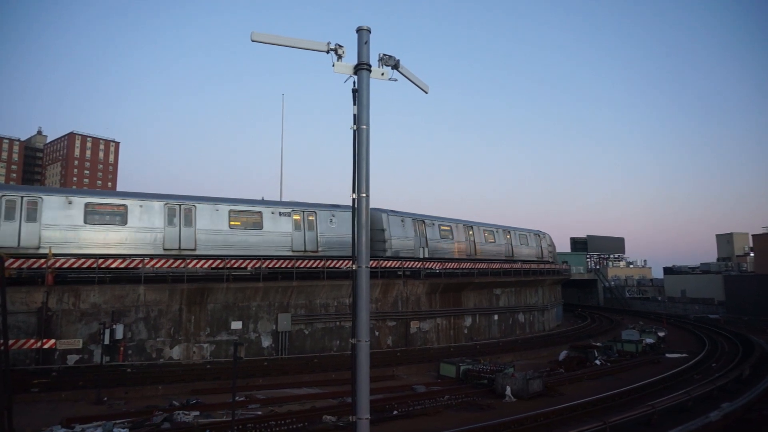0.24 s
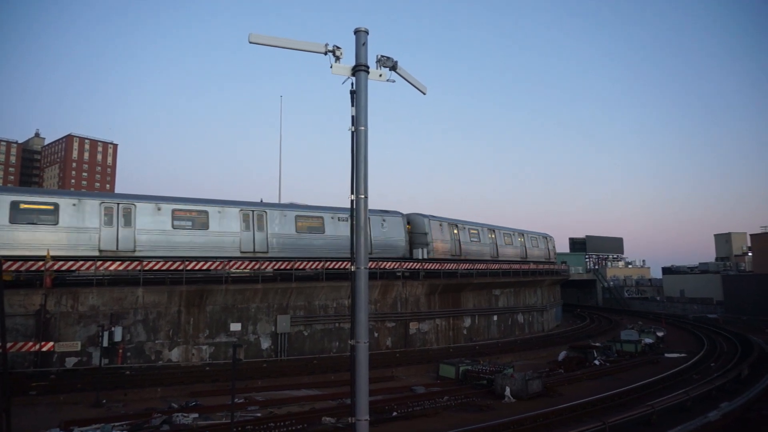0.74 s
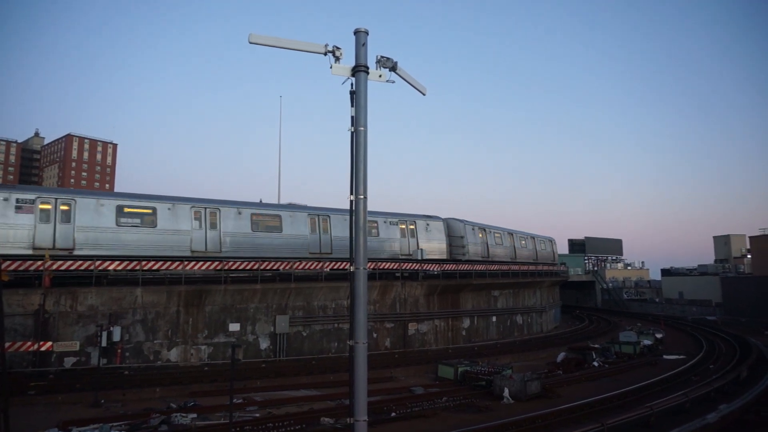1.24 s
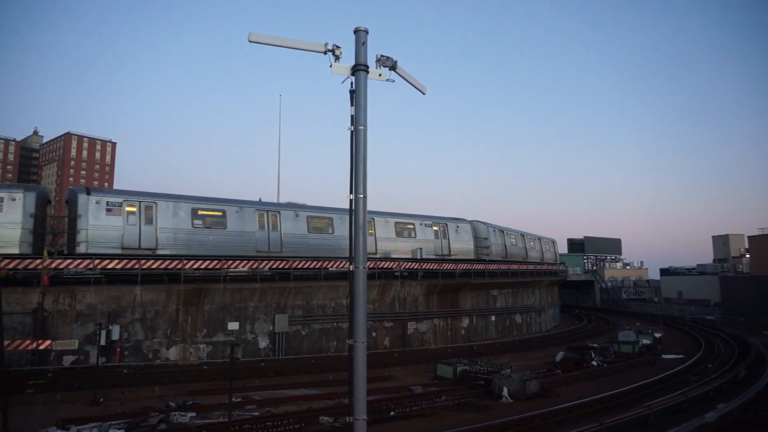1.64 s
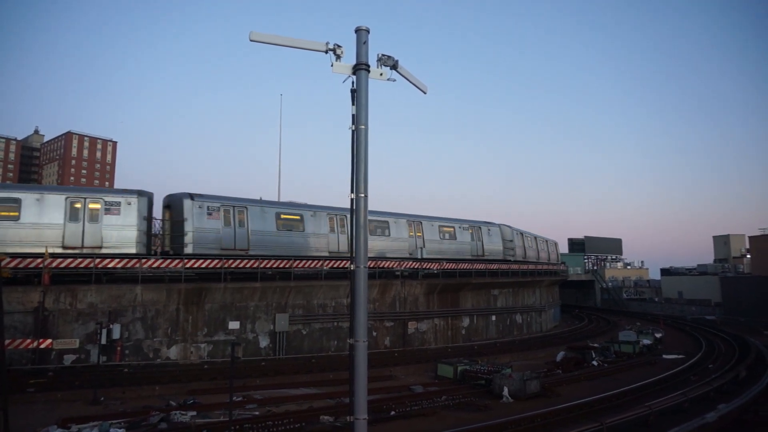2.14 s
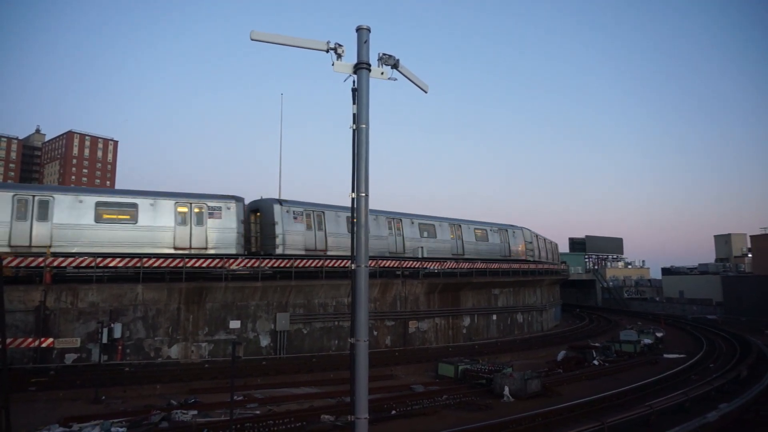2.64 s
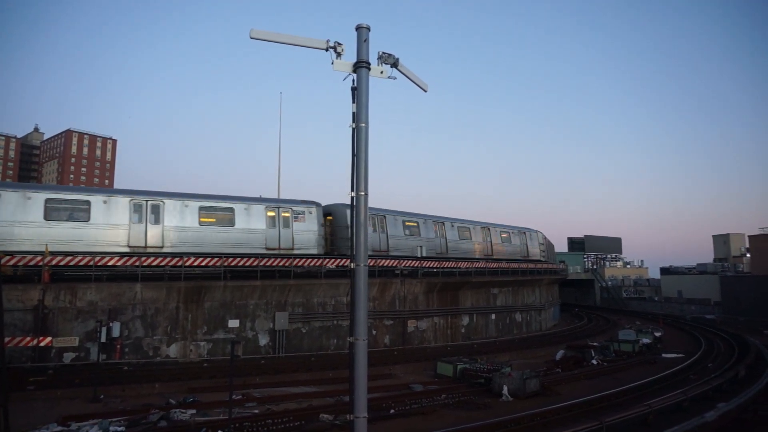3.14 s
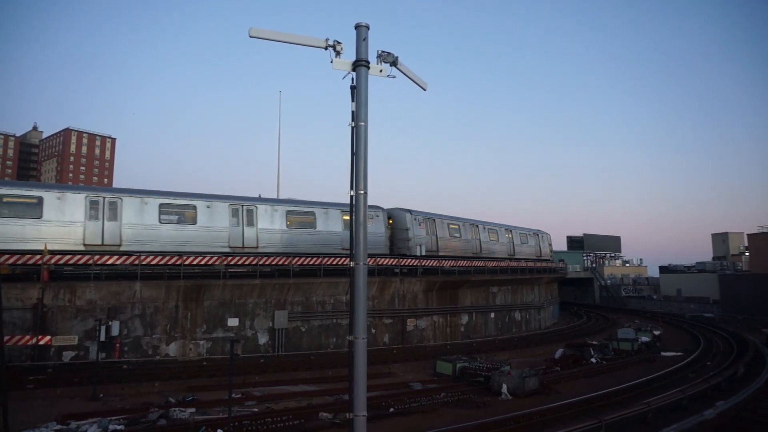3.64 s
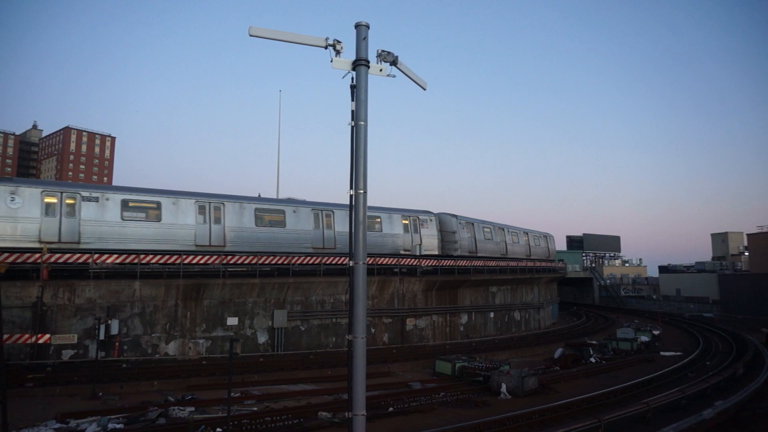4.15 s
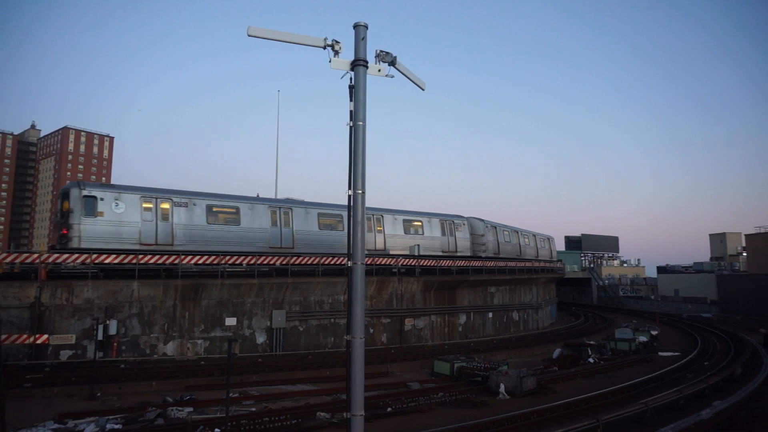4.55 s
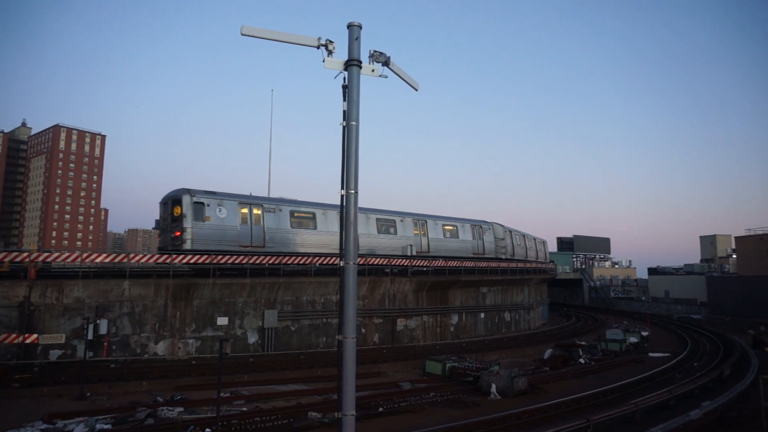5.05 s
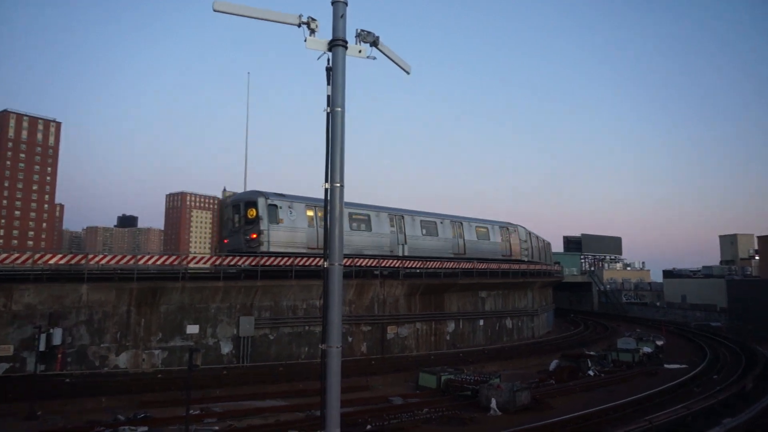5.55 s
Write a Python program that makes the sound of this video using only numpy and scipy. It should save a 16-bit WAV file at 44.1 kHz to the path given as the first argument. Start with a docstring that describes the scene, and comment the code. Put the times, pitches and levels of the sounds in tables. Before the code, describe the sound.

Shrill steel-on-rail screech from a departing train wavers and slowly thins above midrange wheel roar, soft joint knocks and low gusty thuds.

```python
"""Curve squeal of a receding train

A subway train rolls away round a curve on an elevated track, heard from across a rail yard.
Stick-slip drives two wheel modes: clean lines, the lower one sinking, in a halo of Doppler-shifted echoes.
Grazing flanges wake further modes, drawn as tones; filtered noise makes the wheel roar, viaduct
rumble, ringing track, rail-joint knocks, rattles, low gusts and short soft thuds."""
import sys
import numpy as np
from scipy import signal
from scipy.fft import next_fast_len
from scipy.io import wavfile
from scipy.ndimage import uniform_filter1d

SR = 44100
rng = np.random.default_rng(int(sys.argv[2]) if len(sys.argv) > 2 else 0)


def store_wav(level_fs):
    """Save 16-bit WAV to argv[1]."""
    pcm = np.round(np.clip(np.atleast_2d(level_fs), -1, 1) * 32767)
    wavfile.write(sys.argv[1], SR, pcm.T.astype(np.int16))


N = 254898


# stick-slip drive of the lower mode: time_s, level_db
LOW_DRIVE = [(0, -40), (.25, -40.5), (.38, -20.5), (.9, -18), (1.2, -20), (1.6, -18.5), (2.1, -23),
             (2.6, -21.5), (3.2, -21.5), (3.6, -24.5), (4.4, -26), (4.95, -26), (5.4, -31), (5.78, -27.5)]


def low_squeal():
    """Lower wheel mode, Doppler-gliding towards its far pitch."""
    pan_db = in_time(SQUEAL_PAN)[0]
    tone = squeal(low_pitch(), LOW_DRIVE, bites()[0], pan_db, direct_db=-0.2, width=0.79, alike=0.85)
    return from_db(0.57) * tone


# the wheel turns away from the listener and its pitch sinks
FAR_HZ, DOPPLER_HZ, TURN_S = 4700, 106, 2.45


def low_pitch():
    """Doppler glide of the lower squeal, in Hz: exponential approach to the far pitch."""
    return FAR_HZ + DOPPLER_HZ * np.exp(-np.arange(N) / SR / TURN_S)


# pitch of the higher mode: time_s, pitch_hz
HIGH_PITCH = [(0, 6565), (1, 6577), (1.7, 6566), (2.4, 6570), (3, 6535), (3.7, 6505), (4.3, 6493),
              (5, 6468), (5.78, 6460)]
# stick-slip drive of the higher mode: time_s, level_db
HIGH_DRIVE = [(0.0, -32.5), (0.14, -29.5), (0.6, -37.5), (0.76, -31.5), (1.05, -28.5), (1.5, -33.5),
              (1.83, -34), (2.08, -28), (2.35, -30), (2.6, -29.5), (3.5, -26), (3.95, -22.5), (4.55, -25.5),
              (5.1, -27), (5.28, -36.5), (5.68, -26.5)]


def high_squeal():
    """Higher wheel mode, with its own pitch curve and drive."""
    hz = in_time(HIGH_PITCH)[0]
    pan_db = in_time(SQUEAL_PAN)[1]
    tone = squeal(hz, HIGH_DRIVE, bites()[1], pan_db, direct_db=-1.5, width=1.16, alike=0.88)
    return from_db(0.8) * tone


# place of the squeals: time_s, low_left_over_right_db, high_left_over_right_db
SQUEAL_PAN = [(0.0, 3, -2), (0.55, 3.5, -1.0), (1.6, -0.5, -1.5), (2.1, -1.5, -4), (3.7, -2.0, 1),
              (4.2, -2, -1), (5.78, -2, -0.5)]
# direct line over echoes: dB per dB of lead over the echoes, dB per dB of bite
CLEAN_PER_SWELL, CLEAN_PER_BITE = 1.04, 1.9


def squeal(hz, drive, bite_db, pan_db, direct_db, width, alike, flutter_db=0.5):
    """Wheel mode with a slight random flutter; swelling is clean, dying is mostly echo."""
    level_db, = in_time(drive)
    lead_db = level_db - lingering(level_db)
    clean_db = direct_db + CLEAN_PER_SWELL * lead_db + CLEAN_PER_BITE * bite_db
    side_db = np.array([pan_db, -pan_db]) / 2
    gain = from_db(level_db + bite_db + flutter_db * drift(6.7) + side_db)
    return gain * wheel_tone(hz, clean_db, width, alike)


# a wheel bites and its squeal surges (negative: sags): centre_s, length_s, low_db, high_db
BITES = [(1.008, .1, 1, 3.5), (1.553, 0.071, 5.5, -1.5), (2.08, 0.053, 0.5, -1), (2.34, 0.071, 5, 5.5),
         (2.96, 0.049, 3.5, -1), (3.344, 0.067, 7, -4), (3.95, 0.027, -5, 5), (4.63, 0.28, 8.5, 0.5),
         (4.795, 0.032, 3, 5.5), (4.93, 0.13, 6, 1)]


def bites():
    """Level change in dB of the lower and higher squeal as the wheel bites."""
    return sum(np.outer(surge_db, swell(s, length_s)) for s, length_s, *surge_db in BITES)


ECHO_LAG_S = 0.38


def lingering(level_db):
    """Echo level in dB: one-pole power average that trails the wheel."""
    r = np.exp(-1 / (ECHO_LAG_S * SR))
    power = from_db(level_db) ** 2
    echo_power, _ = signal.lfilter([1 - r], [1, -r], power, zi=power[:1])
    return 10 * np.log10(echo_power)


def wheel_tone(hz, direct_db, width, alike=0.81, wander_hz=2.03, steady_s=0.19):
    """Self-excited mode: fading direct line beats with its echoes, running mean power held at 1."""
    direct = from_db(direct_db)
    arrivals = (halo(width, alike) + direct * fading()) / np.hypot(1, direct)
    power = uniform_filter1d(np.mean(abs(arrivals) ** 2, axis=0), int(steady_s * SR))
    phase = 2 * np.pi * np.cumsum(hz + wander_hz * drift(7.7)) / SR
    return np.real(arrivals * np.exp(1j * phase)) * np.sqrt(2 / power)


# echo spectrum of a moving wheel at width 1: shift_hz, relative_db_per_hz
HALO = [(-600, -29.5), (-290, -26.5), (-160, -12), (-81, -9), (-9.5, 2), (54, -6), (118, -4.5), (231, -14),
        (325, -23.5), (696, -37.5)]


def halo(width, alike):
    """Many echoes, each Doppler-shifted: complex stereo noise shaped in frequency."""
    size = next_fast_len(N)
    shift_hz = np.fft.fftfreq(size, 1 / SR) / width
    shape = from_db(np.interp(shift_hz, *np.transpose(HALO), left=-np.inf, right=-np.inf))
    noise = rng.standard_normal((2, size)) + 1j * rng.standard_normal((2, size))
    echoes = np.fft.ifft(shape * noise)
    return rms_one(stereo(*echoes[:, :N], alike))


FADE_DEPTH, FADE_RATE_HZ = 0.31, 9.7


def fading():
    """Complex gain of a steady path plus shifting ones, mean power 1."""
    shifting = drift(FADE_RATE_HZ) + 1j * drift(FADE_RATE_HZ)
    return rms_one(1 + FADE_DEPTH * shifting)


OCTAVE_DB, OCTAVE_LOSS_DB_PER_S = 2.5, 3.5


def squeal_octave():
    """Second harmonic: grows with the lower squeal squared, lost with distance, wider Doppler spread."""
    loss_db = OCTAVE_LOSS_DB_PER_S * np.arange(N) / SR
    level_db = OCTAVE_DB + 2 * lingering(in_time(LOW_DRIVE)[0]) - loss_db
    return from_db(level_db) * wheel_tone(2 * low_pitch(), direct_db=-11, width=1.45)


# brief squeals of other wheels: centre_s, length_s, pitch_hz, peak_db
OTHER_WHEELS = [(.15, 0.65, 8350, -50), (2.39, 1.17, 6510, -30), (3.353, 0.45, 10230, -41.5),
                (4.3, 2.1, 10050, -54.5), (4.86, 1.7, 8330, -57), (5.683, 0.35, 4772, -25)]


def other_wheels():
    """Short wheel modes that swell and die away in a half-ellipse."""
    t, out = np.arange(N) / SR, 0
    for s, length_s, hz, peak_db in OTHER_WHEELS:
        arch = np.sqrt(np.clip(1 - (2 * (t - s) / length_s) ** 2, 0, 1))
        out = out + from_db(peak_db) * arch * wheel_tone(hz, direct_db=1.0, width=0.7)
    return out


# flange grazing the rail: start_s, hold_s, shrill_db, low_db
GRAZES = [(.55, 0.13, -45, -49), (1.835, 0.13, -46, -34), (3.295, 0.13, -42.5, -34.5),
          (3.55, 0.19, -53, -44)]
# shrill modes the flange wakes: pitch_hz, relative_db, halo_width_ratio, direct_db
FLANGE_MODES = [(8380, 1.5, .8, -14), (10250, 2.5, 1.1, -17)]
# light rub between grazes, over contact hiss: shrill_db, low_db
RUB_DB = [-12, 4]
GRAZE_ATTACK_S, GRAZE_RELEASE_S = 0.034, 0.057


def flange(low_hz=1807, ragged_db=2.5):
    """Flange contact drives modes together: they build up, hold unevenly and ring out."""
    t, hiss_db = np.arange(N) / SR, in_time(ROLLING)[2]
    shrill_gain, low_gain = [from_db(hiss_db + db) for db in RUB_DB]
    for s, hold_s, shrill_db, low_db in GRAZES:
        before = np.maximum(s - t, 0) / GRAZE_ATTACK_S
        after = np.maximum(t - s - hold_s, 0) / GRAZE_RELEASE_S
        contact = np.exp(-before - after)
        shrill_gain = shrill_gain + from_db(shrill_db) * contact
        low_gain = low_gain + from_db(low_db) * contact
    shrill = 0
    for hz, db, width, direct_db in FLANGE_MODES:
        shrill = shrill + from_db(db + ragged_db * drift(13)) * wheel_tone(hz, direct_db, width)
    return shrill_gain * shrill + low_gain * wheel_tone(low_hz, direct_db=-2, width=0.34)


# noise of passing bogies: time_s, wheel_roar_db, rail_ring_db, contact_hiss_db
ROLLING = [(0.0, -20.5, -28.5, -46), (0.56, -22.5, -30.0, -53.5), (0.74, -26.5, -35, -51),
           (1.2, -26.5, -36.0, -49.5), (1.74, -25, -36.0, -52), (1.82, -23, -33.0, -46.5),
           (2.35, -25, -31, -48.5), (2.65, -23.5, -34.5, -48.5), (2.9, -23, -33, -47.5),
           (3.7, -23.5, -33, -47.5), (4.1, -22, -32, -49), (4.52, -22.5, -29, -46.5),
           (4.9, -21.5, -32.5, -51.5), (5.4, -23.0, -38.5, -58), (5.68, -23, -33.5, -52.0),
           (5.78, -25.5, -39, -56)]
# deep rumble of the viaduct: time_s, level_db
VIADUCT = [(0.0, -38.5), (0.45, -43), (0.7, -50.5), (2.6, -43), (2.8, -36), (3.4, -42), (4.4, -41),
           (5.3, -34.5), (5.78, -34)]
# centres of viaduct, wheel roar, rail ring, contact hiss: centre_hz
PART_HZ = [130, 600, 2400, 7600]
# level of each part at which the colour holds: level_db
PART_DB = [-39, -24.5, -33.5, -50.5]
# rolling spectrum: frequency_hz, relative_db_per_hz
ROLLING_COLOUR = [(20, -36), (40, -42), (70, -27), (100, -12.5), (160, -9), (240, -9.5), (390, -5.5),
                  (590, -1), (1060, -5.5), (1290, -10), (2000, -12.5), (2950, -17.5), (3600, -22.5),
                  (4400, -23), (5600, -29), (7600, -32.5), (11000, -39)]
# stereo likeness: frequency_hz, left_right_correlation
LIKENESS = [(25, .7), (60, 0.75), (130, 0.93), (270, 0.89), (560, 0.93), (1100, 0.85), (2400, 0.5),
            (5000, 0.83), (11000, 1)]


def rolling(level_db=-49.0, patchy_db=1.4, shared_db=0.88):
    """Rough wheels on rough rail: quarter-octave noise, each band following the parts that radiate it."""
    parts_db = in_time(VIADUCT) + in_time(ROLLING)
    swell_db = np.array([part - db for part, db in zip(parts_db, PART_DB)])
    edges_hz = 18.6 * 2 ** (np.arange(38) / 4)
    out, jolts, white = 0, drift(23), rng.standard_normal((2, 2, N))
    for k, (low, high) in enumerate(zip(edges_hz, edges_hz[1:])):
        hz = np.sqrt(low * high)
        # adjacent bands take different noise
        mid, side = rms_one(band(white[k % 2], low, high))
        shares = np.array([np.interp(np.log(hz), np.log(PART_HZ), part) for part in np.eye(len(PART_HZ))])
        uneven_db = patchy_db * drift(13.0) + shared_db * jolts
        db = level_db + at_hz(ROLLING_COLOUR, hz) + shares @ swell_db + uneven_db
        out = out + from_db(db) * np.sqrt(high - low) * stereo(mid, side, at_hz(LIKENESS, hz))
    return out


# deck and rail resonances: centre_hz, width_hz, relative_db
TRACK_MODES = [(93.5, 39, -21), (241.3, 10, -13), (294.3, 20.4, -9), (327, 20, -8), (504, 35, -13.5),
               (605.7, 51, -6.5), (892.4, 34, -8.5), (1102, 9.4, -12.5)]


def track_ring(level_db=-4.0, uneven_db=2.5):
    """Rolling load keeps deck and rails ringing, each mode swelling in its own time."""
    modes = 0
    for hz, width_hz, db in TRACK_MODES:
        gain = from_db(db + uneven_db * drift(1.8))
        modes = modes + gain * resonance(hz, width_hz, at_hz(LIKENESS, hz))
    return from_db(in_time(ROLLING)[0] + level_db) * modes


def deck_boom(level_db=-3.0, hz=200, width_hz=60, follows=1.5, lumpy_db=2.5, alike=0.65):
    """Deck resonance thuds unevenly under load, more so the harder the viaduct rumbles."""
    load_db = in_time(VIADUCT)[0] - PART_DB[0]
    gain = from_db(PART_DB[0] + level_db + follows * load_db + lumpy_db * drift(15))
    return gain * band(resonance(hz, width_hz, alike), hz / 2, hz * 2)


# wheels over rail joints: time_s, relative_db
KNOCKS = [(0.239, -21), (.49, -25), (0.971, -24.5), (1.285, -18.5), (1.49, -24), (2.89, -21),
          (3.689, -16.5), (4.5, -31)]
# deck and rail modes a knock rings: centre_hz, relative_db, t60_s
KNOCK_MODES = [(300, -4, .25), (332, -3.5, 0.32), (560, -9, 0.13), (594, -2.5, 0.28), (656, 1, 0.1),
               (980, -3, 0.12), (1210, -13, 0.15), (1850, -12, .15)]


def knocks(level_db=-2, contact_s=0.003, alike=0.97):
    """Joints jolt the deck; each mode is a cluster of close resonances that dies away."""
    out, blows = 0, np.zeros(N)
    for s, db in KNOCKS:
        blows[int(s * SR)] = from_db(db + level_db)
    blows = uniform_filter1d(blows, int(contact_s * SR))
    for hz, db, t60_s in KNOCK_MODES:
        # the tiny offset avoids denormals
        decay = signal.lfilter([1], [1, -from_db(-60 / (t60_s * SR))], blows + 1e-18)
        out = out + from_db(db) * decay * resonance(hz, hz / 10, alike)
    return out


# couplers and gear: start_s, level_db
RATTLES = [(.325, -34), (1.286, -42), (2.89, -36), (5.05, -49), (5.158, -41), (5.69, -49)]


def rattles(decay_s=0.085, low_hz=2500, alike=0.96):
    """Loose steel chatters: bright noise with abrupt onsets and exponential decays."""
    t = np.arange(N) / SR
    shake = sum(from_db(db) * (t > s) * np.exp(-abs(t - s) / decay_s) for s, db in RATTLES)
    chatter = band(rng.standard_normal((2, N)), low_hz, 10000)
    return shake * stereo(*rms_one(chatter * from_db(1.6 * drift(80))), alike)


# low gusts and short soft thuds: centre_s, length_s, peak_db
GUSTS_AND_THUDS = [(0.054, .2, -25), (.4, 0.32, -30), (1.973, 0.17, -40), (2.878, 0.33, -29),
                   (3.133, 0.14, -24), (3.457, 0.25, -31), (3.963, .2, -31), (5.043, 0.34, -28),
                   (5.332, 0.39, -27.5), (5.5, 0.095, -29), (5.685, 0.15, -30)]


def gusts_and_thuds(level_db=0.0, low_hz=260, high_hz=480, lumpy_db=1.0, sub_hz=60, surge_db=-1.0):
    """Low noise, separate in each channel, in quick lumps and slower surges under each swell."""
    lumps_db = lumpy_db * np.array([drift(35), drift(32)])
    noise = rng.standard_normal((2, N)) * from_db(lumps_db)
    for order, hz, kind in (1, low_hz, "high"), (2, sub_hz, "high"), (2, high_hz, "low"):
        noise = signal.sosfilt(signal.butter(order, hz, kind, fs=SR, output="sos"), noise)
    swells = sum(from_db(db) * swell(s, length_s) for s, length_s, db in GUSTS_AND_THUDS)
    return from_db(level_db) * swells * rms_one(noise * from_db(surge_db * drift(5.2)))


def resonance(hz, width_hz, alike):
    """Noise-driven resonance in stereo, at unit power."""
    ringing = signal.lfilter(*signal.iirpeak(hz, hz / width_hz, fs=SR), rng.standard_normal((2, N)))
    return stereo(*rms_one(ringing), alike)


def band(x, low_hz, high_hz):
    """Butterworth band-pass."""
    return signal.sosfilt(signal.butter(2, [low_hz, high_hz], "band", fs=SR, output="sos"), x)


def stereo(mid, side, alike):
    """Two channels with a given correlation from two unrelated signals."""
    alike = np.clip(alike, 0, 0.995)
    return np.sqrt((1 + alike) / 2) * mid + np.sqrt((1 - alike) / 2) * np.array([side, -side])


def swell(centre_s, length_s):
    """Gaussian rise and fall with peak 1; length is between the 1/e points."""
    return np.exp(-(2 * (np.arange(N) / SR - centre_s) / length_s) ** 2)


def drift(rate_hz):
    """Slow random curve of unit RMS: two-pole low-passed noise, made at SR / 40."""
    r = np.exp(-80 * np.pi * rate_hz / SR)
    noise = rng.standard_normal(N // 40 + 2002)
    slow = signal.lfilter([1], [1, -2 * r, r * r], noise)[2000:]  # drop the filter's start-up
    return np.interp(np.arange(N) / 40, np.arange(len(slow)), rms_one(slow))


def in_time(rows):
    """Each column of a curve, at every sample."""
    s, *columns = np.transpose(rows)
    return [np.interp(np.arange(N) / SR, s, c) for c in columns]


def at_hz(points, hz):
    """Read a spectrum on a log-frequency axis."""
    points_hz, values = np.transpose(points)
    return np.interp(np.log(hz), np.log(points_hz), values)


def from_db(db):
    """Decibels to gain."""
    return 10 ** (np.asarray(db) / 20)


def rms_one(x):
    """Scale to unit power."""
    return x / np.sqrt(np.mean(abs(x) ** 2) + 1e-20)


# brief dips of the train's level: centre_s, length_s, depth_db
DIPS = [(5.014, .04, 4.5), (5.478, 0.054, 5.5)]


def scene():
    """Squeals over the rolling train, dipping briefly, with low gusts and soft thuds."""
    wheels = low_squeal() + high_squeal() + squeal_octave() + other_wheels() + flange()
    track = rolling() + track_ring() + deck_boom() + knocks() + rattles()
    dip_db = sum(depth_db * swell(s, length_s) for s, length_s, depth_db in DIPS)
    return from_db(-dip_db) * (wheels + track) + gusts_and_thuds()


CUTOFF_HZ = 11000


def record(dry):
    """Steep elliptic low-pass cuts the top."""
    return signal.sosfilt(signal.ellip(16, 0.1, 90, CUTOFF_HZ, fs=SR, output="sos"), dry)


dry = scene()
out = record(dry)
store_wav(out)
```